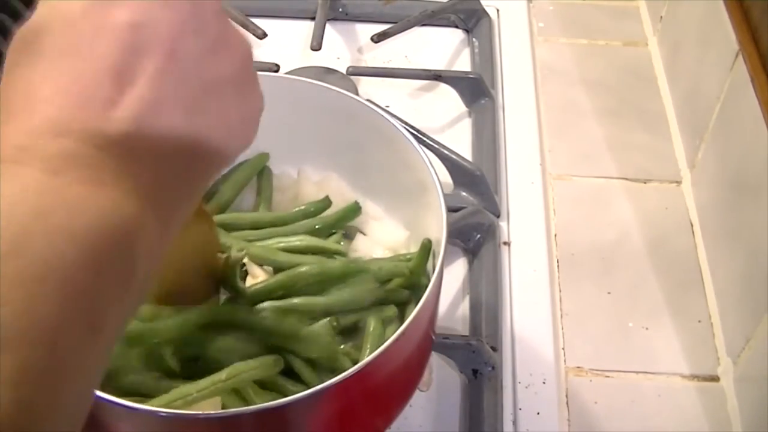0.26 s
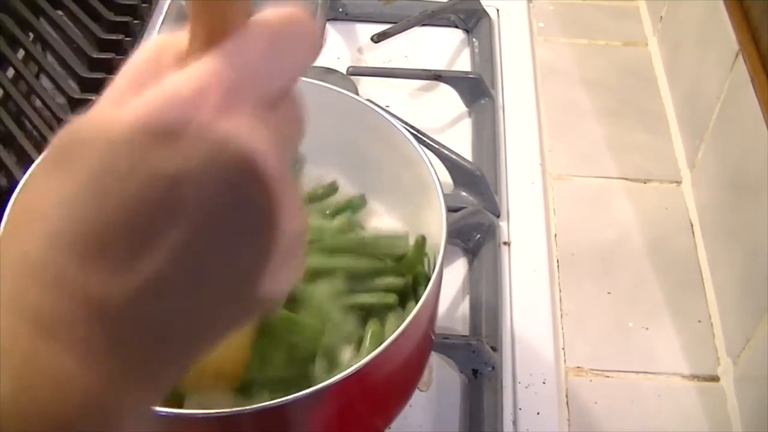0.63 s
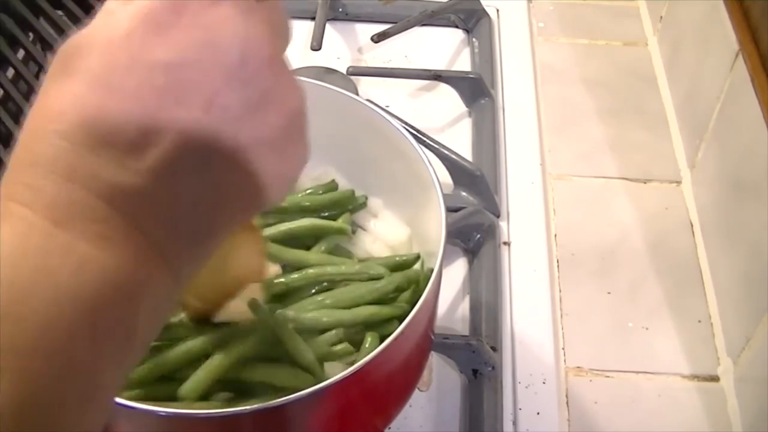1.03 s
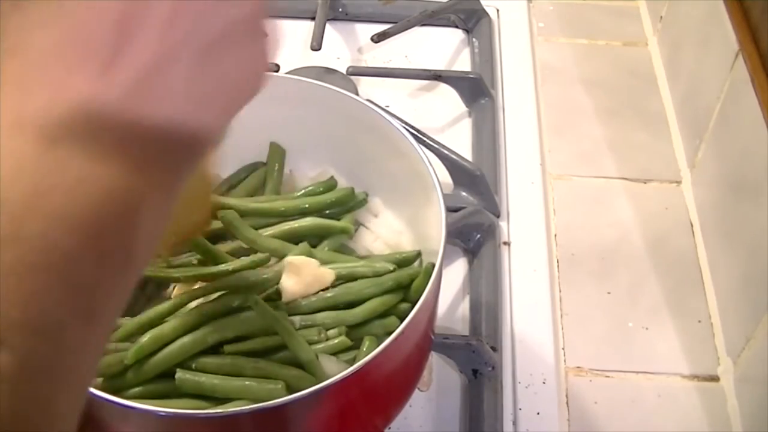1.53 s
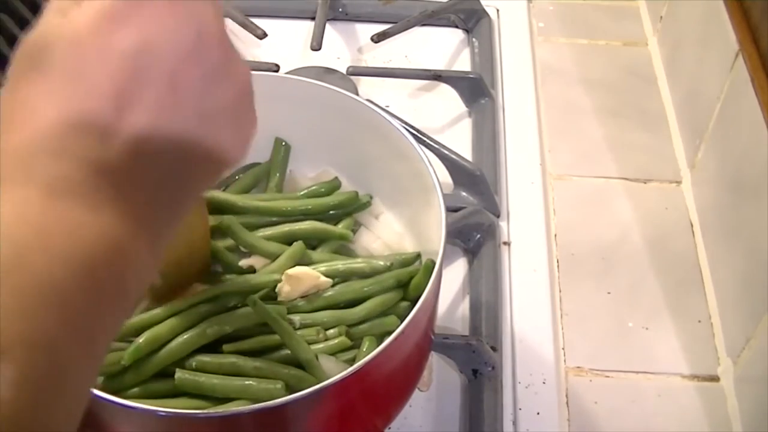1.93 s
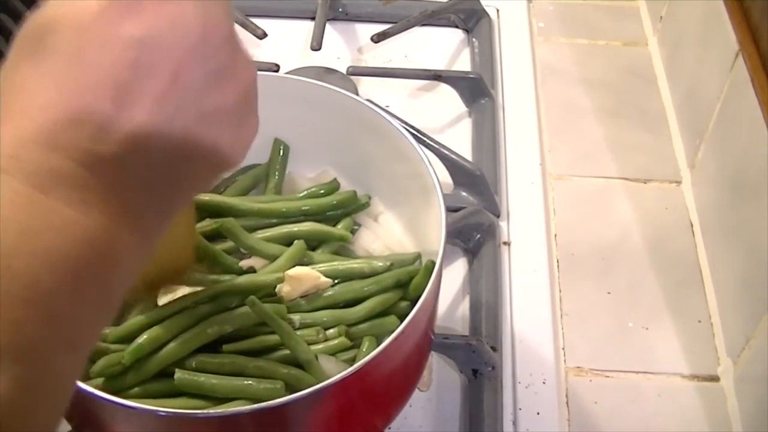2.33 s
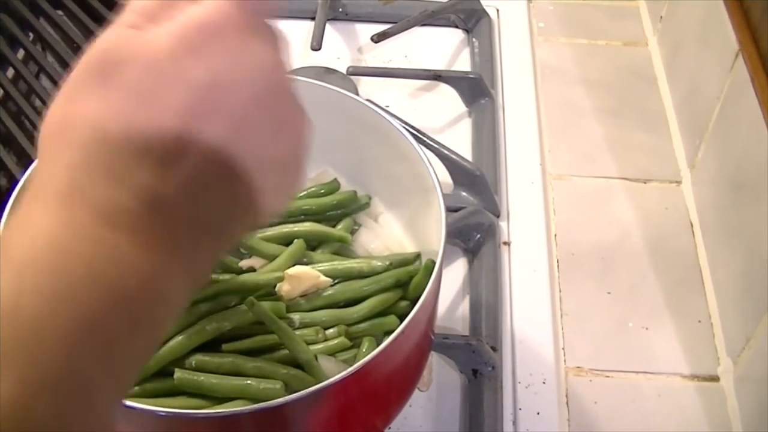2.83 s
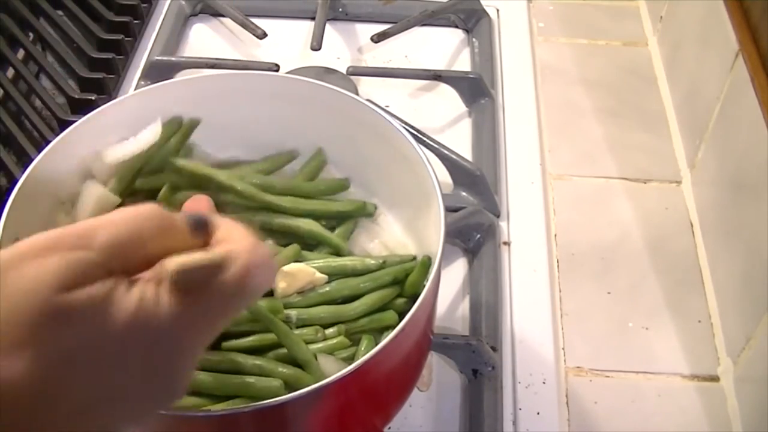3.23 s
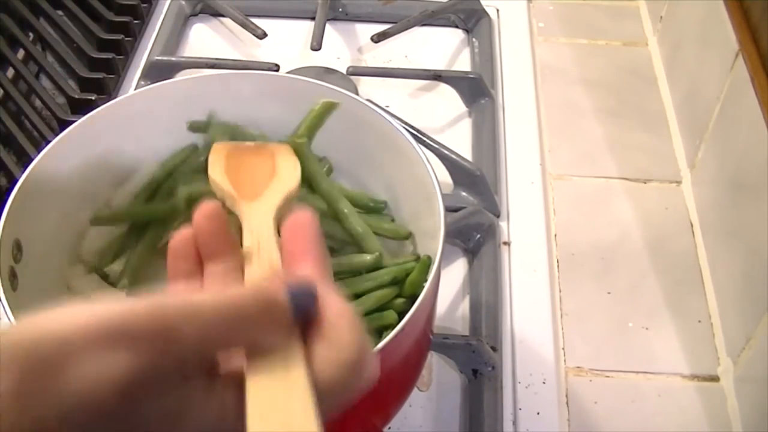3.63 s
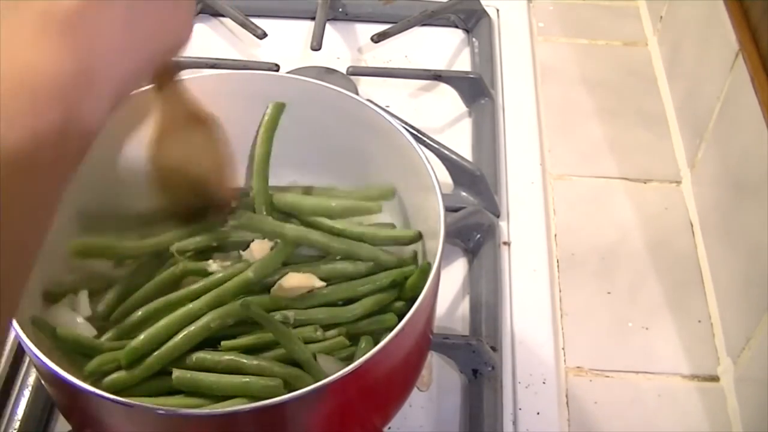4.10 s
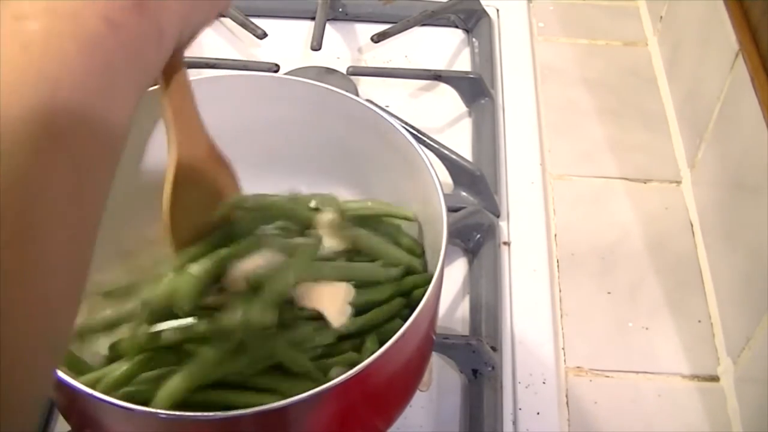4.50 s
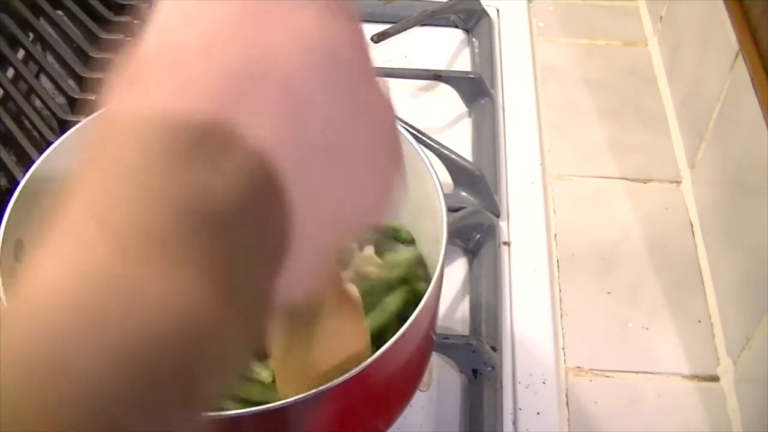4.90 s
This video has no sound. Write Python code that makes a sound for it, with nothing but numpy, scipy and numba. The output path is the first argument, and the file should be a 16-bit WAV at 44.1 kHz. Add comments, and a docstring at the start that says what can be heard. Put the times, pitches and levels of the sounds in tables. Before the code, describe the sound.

Green beans and onion sizzle steadily in a metal pot while a wooden spoon stirs, scrapes and gives four hard clattering knocks.

```python
"""Beans and onion sizzling in a pot

Green beans and onion sizzle in butter in a metal pot on a gas stove, close to a small camera in a kitchen.
Bubble bursts make the sizzle, coloured by the air in the pot; the burner is filtered noise over a faint hum. A
wooden spoon stirs in strokes that rub the beans, scrape the pot and make the sizzle flare; its bumps ring the
pot's modes. Four hard knocks rock the pot on the grate; fat spits and the spoon clicks in short cracks of
noise. The camera's limiter ducks the sizzle after every hard knock."""
import sys
import numpy as np
from scipy import signal
from scipy.fft import rfft, irfft
from scipy.io import wavfile
from scipy.ndimage import uniform_filter1d
from numba import njit

SR = 44100
rng = np.random.default_rng(int(sys.argv[2]) if len(sys.argv) > 2 else 0)


def bounce(signal):
    """Save signal as a 16-bit WAV file at the path given by the first command-line argument."""
    frames = np.transpose(np.atleast_2d(signal))
    limited = np.clip(frames, -1, 1)
    pcm = np.round(limited * 32767).astype(np.int16)
    wavfile.write(sys.argv[1], SR, pcm)


N = 227247
TIME = np.arange(N) / SR

# Air resonances of the open pot: (f/Hz, width/Hz, lift/dB)
CAVITY = [(838, 26, 6.5), (1277, 64, 11.5), (1490, 55, -1), (1890, 136, 4.5), (2200, 160, 3),
          (2880, 280, 4), (3420, 490, 1.5)]
# Strokes of the spoon: (start t/s, length/s, rubbing beans level/dB, flare of the sizzle/dB,
# scrape on the pot floor level/dB)
STROKES = [(0, 0.19, -42, 2.4, -37.5), (0.564, 0.22, -48, 2, -33), (0.866, 0.34, -38, 3, -47),
           (1.24, 0.2, -53, 1.4, -50), (3.137, 0.69, -39, 0.9, -50), (4.028, 0.071, -33, .3, -28.5),
           (4.256, 0.3, -41, 1.5, -37), (4.63, 0.19, -37, 1.5, -42), (4.884, 0.23, -32.5, 1.2, -36)]
# Hard knocks that rock the pot: (t/s, relative level/dB, contact sharpness f/Hz, wall lift/dB before its
# shares, deep thud level/dB, relative level of the rebounds/dB, time from the knock to their strongest/s)
KNOCKS = [(2.1912, 11.5, 3300, 3, -19, -7, 0.077), (2.6658, 7.5, 2570, -1.5, -9, -11, 0.019),
          (3.042, 8.5, 2270, -6, -46, -13, 0.023), (4.2069, 6, 3500, 6, -42, -8.5, 0.083)]


def undb(db):
    """Decibels to gain."""
    return 10 ** (np.asarray(db) / 20)


def unit(x):
    """Scale to rms 1."""
    return x / np.sqrt(np.mean(x ** 2))


def add(track, s, sound):
    """Mix a sound into a track at time s."""
    i = max(int(s * SR), 0)
    track[i:i + len(sound)] += sound[:N - i]


def edge(x, hz, kind, order=2):
    """Low-pass or high-pass."""
    sos = signal.butter(order, min(hz, SR / 2 - 1000), kind, fs=SR, output="sos")
    return signal.sosfilt(sos, x)


def colour(x, points, peaks=(), size=8192):
    """Causal filter from a smooth spectrum (f/Hz, level/dB) with resonances on top."""
    f = np.arange(size // 2 + 1) * SR / size + 1
    hz, level_db = np.transpose(points)
    db = np.interp(np.log(f), np.log(hz), level_db)
    for centre, width, lift in peaks:
        db = db + lift / (1 + (2 * (f - centre) / width) ** 2)
    # folding the cepstrum forward in time gives minimum phase
    cepstrum = irfft(db * np.log(10) / 20)[:size // 2]
    cepstrum[1:] *= 2
    response = irfft(np.exp(rfft(cepstrum, size)))
    return signal.fftconvolve(x, response)[:len(x)]


def walk(rate):
    """Slow random drift with a spread near 1, from steps drawn rate times a second."""
    k = max(int(SR / rate), 2)
    steps = np.repeat(rng.standard_normal(N // k + 1), k)
    smooth = uniform_filter1d(uniform_filter1d(steps, k), k)
    return unit(smooth[:N])


def bursts(rate, spread_db):
    """Random tiny impulses, rate per second on average: many faint ones, a few strong."""
    size = undb(spread_db * np.minimum(rng.exponential(size=N), 6))
    happens = rng.random(N) < rate / SR
    return unit(happens * size * rng.choice([-1, 1], N))


def swell(s, length, taper=1):
    """Rises from 0 to 1 at time s and falls back within length s."""
    out = np.zeros(N)
    add(out, s, signal.windows.tukey(max(int(length * SR), 8), taper))
    return out


def kitchen(x, wet_db, t60_s, damp_hz, gap_s=0.0013):
    """Direct sound plus dense reflections from tiles and cupboards, which die sooner in the treble."""
    t = np.arange(SR) / SR
    noise = rng.standard_normal(SR)
    low = edge(noise, damp_hz, "low", order=1)
    high = noise - low
    onset = np.clip(t / gap_s - .5, 0, 1)
    # the treble dies twice as fast
    tail = (low * undb(-60 * t / t60_s) + high * undb(-120 * t / t60_s)) * onset
    return x + undb(wet_db) * signal.fftconvolve(x, tail / np.linalg.norm(tail))[:N]


def sizzle(rest_db=-27, coarse_db=0, fine_db=0, flicker_db=1.05):
    """Steam bubbles burst in the butter, coarse low and fine high; each stroke turns wet sides to the heat."""
    # Spectrum of the bursting bubbles: (f/Hz, relative level/dB)
    fry_colour = [(150, -32), (300, -16), (600, -0.5), (1000, -2), (1500, 4.5), (2400, 1), (4200, 6.5),
                  (5100, 1.5), (6100, 2), (8000, -6), (10000, -13.5), (12000, -18.5), (13500, -31),
                  (16000, -63)]
    coarse = edge(bursts(9000, 1.84), 3120, "low") * undb(coarse_db + flicker_db * walk(25.18))
    fine = edge(bursts(8000, 1.7), 4490, "high") * undb(fine_db + flicker_db * walk(35))
    in_pot = colour(coarse + fine, fry_colour, CAVITY)
    fry = kitchen(in_pot, wet_db=-13.5, t60_s=0.3, damp_hz=6000)
    flare_db = sum(db * swell(s, length) for s, length, _, db, _ in STROKES)
    return unit(fry) * undb(rest_db + flare_db)


def beans(resting_db=-49.5):
    """Wet pods slide over each other and the pot floor in short, uneven rubs, most during a stroke."""
    rubs = bursts(1500, 1.5) * undb(5 * walk(22))
    push = undb(resting_db) + sum(undb(db) * swell(s, length) for s, length, db, _, _ in STROKES)
    pod_colour = [(150, -66), (600, -3.5), (1800, 9.5), (3500, -5), (9000, -19), (15000, -41)]
    return unit(colour(rubs, pod_colour, CAVITY)) * push


def burner(rush_db=-48):
    """The low rush of the flame is filtered noise, with a faint hum of wavering sines under it."""
    # Spectrum of the burner and kitchen: (f/Hz, relative level/dB)
    burner_colour = [(20, -35), (70, -35), (125, -11.5), (170, -10.5), (240, 1.5), (290, 1.5), (360, -3.5),
                     (445, 8), (520, -19), (640, 1), (1000, -14), (3000, -17)]
    # Steady hum: (f/Hz, rms level/dB)
    hum_tones = [(119.5, -72), (240, -58)]
    rush = unit(colour(rng.standard_normal(N), burner_colour)) * undb(rush_db + 0.32 * walk(7.2))
    hum = np.zeros(N)
    for hz, db in hum_tones:
        phase = 2 * np.pi * hz * TIME + 0.11 * walk(2.1)
        hum += np.sqrt(2) * undb(db) * np.sin(phase)
    return rush + hum


def wall_lifts(wall_db):
    """A blow on the wall lifts the wall's resonances and starves the floor's; a negative lift reverses it."""
    # Resonances of wall and floor: (f/Hz, width/Hz, share of the lift)
    wall_modes = [(1268, 240, 0.91), (1760, 100, 0.54), (824, 180, 0.38), (993, 150, -0.57),
                  (620, 150, -0.8)]
    return [(centre, width, share * wall_db) for centre, width, share in wall_modes]


def scrapes(grind_db=-18, grind_lag_s=0.018, grind_tail_s=0.046, wall_db=7):
    """The spoon sticks and slips on the pot, and the rocking pot on the grate: a dense train of tiny catches."""
    # Spectrum of the scraping: (f/Hz, relative level/dB)
    scrape_colour = [(150, -24.5), (330, -3.5), (540, -24), (740, 6.5), (1000, -1.5), (1400, 2.5),
                     (2200, 2), (3400, -0.5), (5000, -16), (8000, -35), (15000, -50)]
    spoon = sum(undb(db) * swell(s, length) for s, length, _, _, db in STROKES)
    grate = np.zeros(N)
    for s, *_, rebound_db, peak_s in KNOCKS:
        # grind_db counts from the knock's rebound level in the table
        grate += undb(rebound_db + grind_db) * swell(s + grind_lag_s, peak_s + grind_tail_s, taper=0.39)
    catches = unit(colour(bursts(2500, 0.99), scrape_colour, wall_lifts(wall_db)))
    return kitchen((spoon + grate) * catches, wet_db=-9, t60_s=0.73, damp_hz=4500)


def blow(contact_hz, wall_db, clatter_db, clack_db, body_db=5,
         clack_t60_s=0.013, clatter_t60_s=0.054, rattle_db=-20, rattle_t60_s=0.23):
    """One contact gives a short woody clatter and rings the pot; a soft contact dulls both."""
    # Modes of the loaded pot: (f/Hz before detuning, relative level/dB, t60/s)
    pot_modes = [(323, -11.5, 0.27), (495, -14.5, 0.29), (614.5, -14.5, 0.25), (662, -14, 0.17),
                 (710, -4, 0.14), (765.5, -9.5, 0.16), (820, -2.5, 0.027), (863, -7.5, 0.14),
                 (982, -26, 0.27), (1052, -7, 0.029), (1227, -13, 0.081), (1317, 0, 0.055),
                 (1465, -10, 0.06), (1760, -6.5, 0.056), (1870, -11, 0.032), (2245, -7, 0.092)]
    # Dense, short clatter of wood, pot and grate: (f/Hz, relative level/dB)
    clatter_colour = [(150, -25.5), (400, -22), (540, -25), (660, 7.5), (850, 8), (1050, 2), (1350, 2),
                      (1900, -4), (2700, -7), (4500, -9), (7000, -14), (15000, -21)]
    t = np.arange(SR // 4) / SR
    hz, db, t60 = np.array(pot_modes).T[:, :, None]
    # while the spoon still presses on the pot, much of the swing dies at once
    decay = np.exp(-np.log(1000) * t / t60) + undb(clack_db - 60 * t / clack_t60_s)
    # the spot struck sets the strength of each mode; the shifting load detunes it a little
    spot, detune = rng.standard_normal((2, len(pot_modes), 1))
    swing = np.sin(2 * np.pi * hz * (1 + 0.01 * detune) * t)
    ring = (undb(db + 2 * spot) * decay * swing).sum(axis=0)
    fade = undb(-60 * t / clatter_t60_s) + undb(rattle_db - 60 * t / rattle_t60_s)
    contact = rng.standard_normal(len(t)) * fade
    clatter = unit(colour(contact, clatter_colour, wall_lifts(body_db)))
    sound = ring + undb(clatter_db) * clatter
    # a flat spectrum, so that only the wall lifts act
    placed = colour(sound, [(1, 0)], wall_lifts(wall_db), size=2048)
    return edge(placed, contact_hz, "low")


def knocks(level_db=-12, knock_clatter_db=-8.0, bump_clatter_db=-22, knock_clack_db=2, bump_clack_db=-12):
    """The spoon hits the pot: hard knocks set it rocking, light bumps only ring it."""
    # Light bumps while stirring: (t/s, relative level/dB, contact sharpness f/Hz, wall lift/dB before its shares)
    bumps = [(.022, -16, 895, -8), (.088, -18, 3960, -7), (.278, -7.5, 1110, 5), (.734, -12.5, 800, -6.5),
             (1.009, -14, 850, -1), (1.089, -20, 2500, 13), (1.374, -21.5, 1800, 27),
             (1.675, -12.5, 900, 5), (1.912, -15, 900, 0), (2.170, -7, 700, -5), (2.822, -27, 2000, 21),
             (2.924, -19.5, 3000, 8), (4.357, -6.5, 805, -4), (4.404, -16.5, 1970, 3),
             (4.954, -20, 2200, 0)]
    out = np.zeros(N)
    for s, db, contact_hz, wall_db, _, rebound_db, peak_s in KNOCKS:
        add(out, s, undb(db) * blow(contact_hz, wall_db, knock_clatter_db, knock_clack_db))
        out += rocking(s, rebound_db, peak_s, wall_db)
    for s, db, contact_hz, wall_db in bumps:
        add(out, s, undb(db) * blow(contact_hz, wall_db, bump_clatter_db, bump_clack_db))
    lean = edge(out, 623, "high", order=4)
    return undb(level_db) * kitchen(lean, wet_db=-14, t60_s=0.44, damp_hz=4530)


def ticks(t60_s=0.0007, spray_db=-19, spray_t60_s=0.028, faint_count=7, faint_db=-12.5, faint_hz=5000):
    """Sharp cracks: drops of water burst in the fat, or the spoon clicks on the pot; each a crack, then a
    little spray."""
    # The loudest cracks, spits of fat and clicks of the spoon on the pot: (t/s, peak level/dB before the room,
    # centre f/Hz)
    loud_ticks = [(0.0876, -4, 3170), (.094, -13, 2490), (.656, 1.5, 6040), (0.946, -10, 4050),
                  (1.0665, -7, 4600), (1.464, -9, 5300), (1.532, -13, 6000), (2.305, -13, 3820),
                  (2.626, -12, 5030), (2.925, -13, 7000), (3.297, -12, 6000), (4.185, -2, 3880),
                  (4.2064, 3, 5300), (4.7523, -7, 3200)]
    out, t = np.zeros(N), np.arange(SR // 10) / SR
    # the lesser ones come at random
    faint_spits = [(s, faint_db, faint_hz) for s in rng.random(faint_count) * N / SR]
    for s, db, hz in loud_ticks + faint_spits:
        fade = undb(-60 * t / t60_s) + undb(spray_db - 60 * t / spray_t60_s)
        crack = rng.standard_normal(len(t)) * fade
        hump = [(hz / 32, -32), (hz / 4, -13), (hz / 2, -8), (hz, 0), (hz * 2, -18), (hz * 4, -32)]
        crack = colour(crack, hump, CAVITY)
        add(out, s, undb(db) * crack / np.abs(crack).max())
    return kitchen(out, wet_db=-7.5, t60_s=1.0, damp_hz=6000)


def rocking(s, db, peak_s, wall_db, count=11, jitter=.15, scatter_db=1.0, clatter_db=-19, clack_db=-3):
    """After a knock the pot chatters on the grate: quick, uneven rebounds grow as it falls back, then die away."""
    spacing_s, contact_hz = .0175, 1850
    grow_db_per_s, fade_db_per_s = 32, 163  # before and after their strongest
    out = np.zeros(N)
    for k, (late, strong) in enumerate(rng.standard_normal((count, 2))):
        after_s = spacing_s * (k + 1 + jitter * late)
        below_db = max(fade_db_per_s * (after_s - peak_s), grow_db_per_s * (peak_s - after_s))
        gain = undb(db - below_db + scatter_db * strong)
        add(out, s + after_s, gain * blow(contact_hz, wall_db, clatter_db, clack_db))
    return out


def thuds(push_s=0.00012, lag_s=0.00052):
    """A low thump at each hard knock: one short, smooth push."""
    out, t = np.zeros(N), np.arange(SR // 20) / SR
    push = t / push_s * np.exp(1 - t / push_s)  # peaks at 1 after push_s
    for s, _, _, _, db, _, _ in KNOCKS:
        add(out, s + lag_s, undb(db) * push)
    return out


def scene(side_db=-19, low_side_db=-4, hit_side_db=-7, size=1024):
    """Two ports sit close together: only faint scattered sound differs between them, least for the direct hits."""
    steady = sizzle() + beans() + burner()
    hits = scrapes() + knocks() + ticks() + thuds()
    # random phases at equal strength smear the sound in time
    scatter = irfft(np.exp(2j * np.pi * rng.random(size // 2 + 1)))
    side = signal.fftconvolve(steady + undb(hit_side_db) * hits, scatter)[:N]
    side = undb(side_db) * colour(side, [(150, -5.5), (1200, low_side_db), (4000, -2.0), (9000, -3.5)])
    middle = steady + hits
    return np.array([middle + side, middle - side])


@njit
def follow(size, top, attack, release):
    """Level detector: rises quickly above the threshold and sinks back to it."""
    out, e = np.empty(len(size)), top
    for i in range(len(size)):
        if size[i] > e:
            e += (size[i] - e) * attack
        else:
            e = max(top, e * (1 - release))
        out[i] = e
    return out


def record(dry, top_db=-7, low_cut_hz=80, top_hz=15900):
    """The limiter lets the first swing through to clip, then ducks everything; deep bass and top are cut."""
    attack_s, release_s = .0012, .024
    top = float(undb(top_db))
    loudest = np.abs(dry).max(axis=0)  # one gain for both ports
    gain = top / follow(loudest, top, 1 / (attack_s * SR), 1 / (release_s * SR))
    loud = edge(np.clip(dry * gain, -1, 1), low_cut_hz, "high", order=1)
    return signal.sosfilt(signal.ellip(12, .2, 90, top_hz, fs=SR, output="sos"), loud)


dry = scene()
out = record(dry)
bounce(out)
```